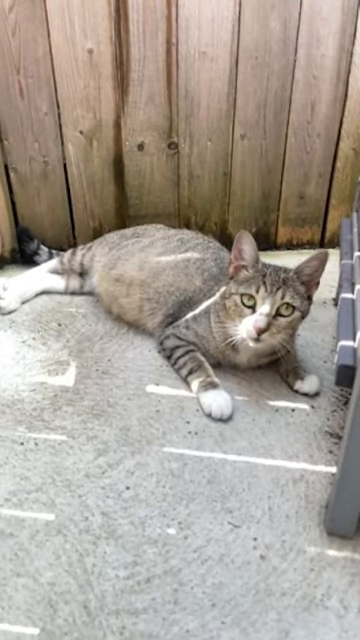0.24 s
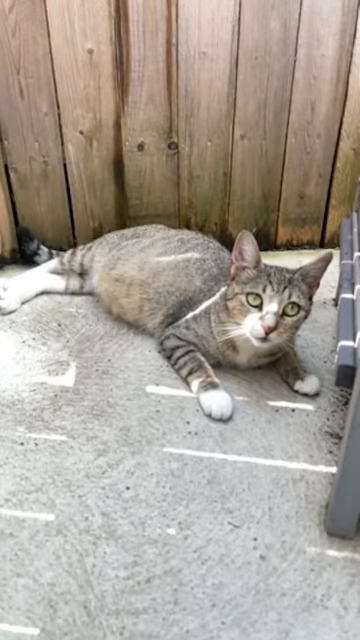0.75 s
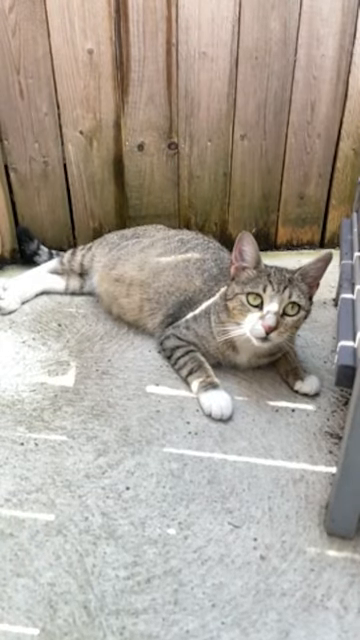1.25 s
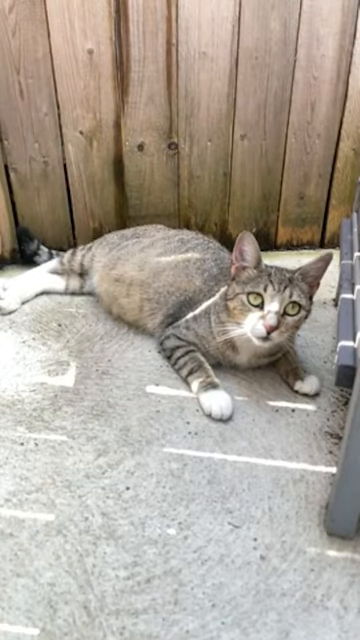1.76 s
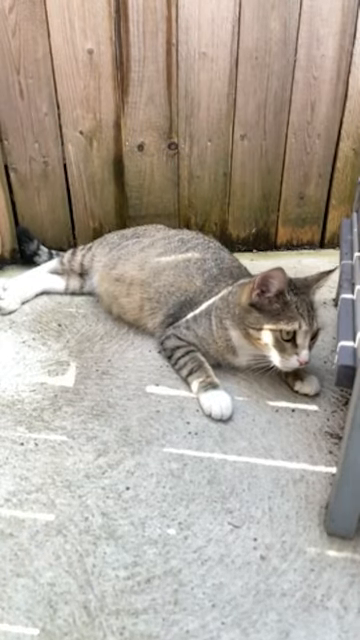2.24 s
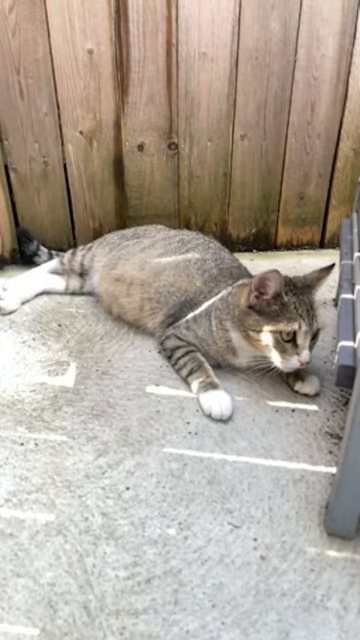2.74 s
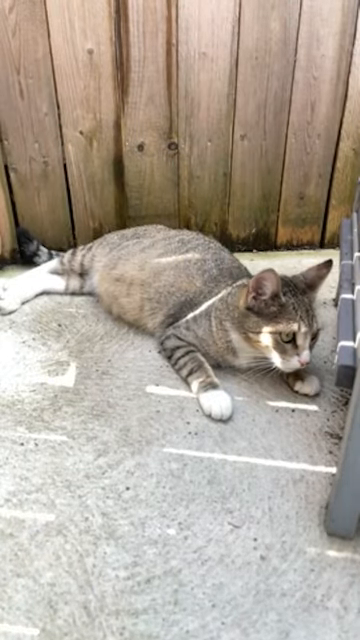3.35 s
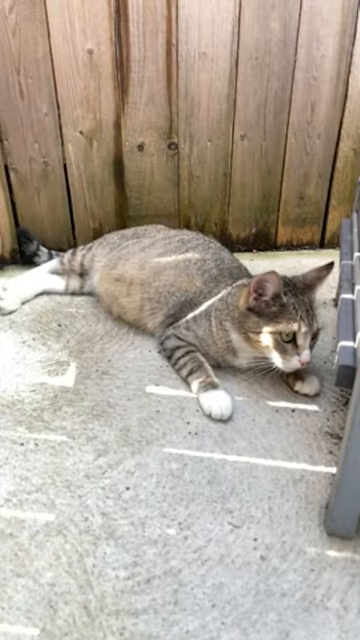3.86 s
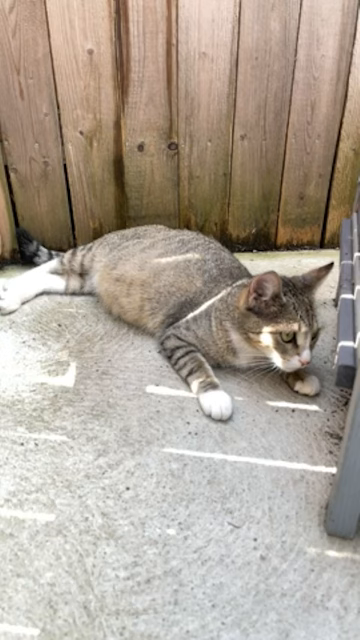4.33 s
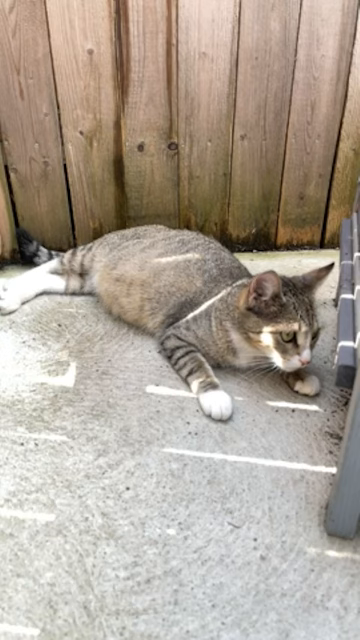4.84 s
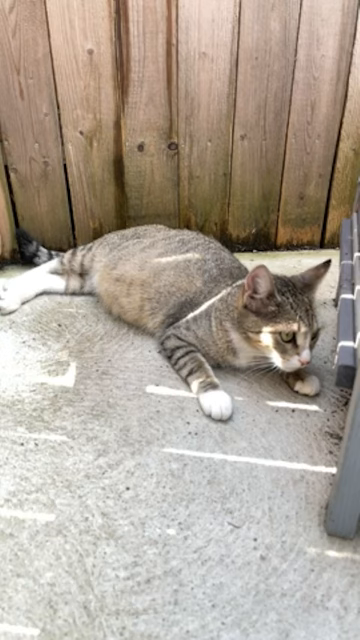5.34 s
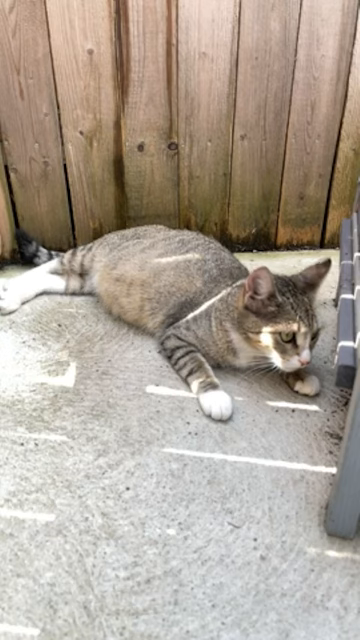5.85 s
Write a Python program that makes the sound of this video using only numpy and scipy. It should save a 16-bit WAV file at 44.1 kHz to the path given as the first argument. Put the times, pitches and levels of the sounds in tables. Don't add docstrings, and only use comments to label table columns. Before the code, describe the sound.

A breaker hammer a few gardens away rattles in rapid blows, pauses while a phone crackles in the hand, tries once, then resumes hammering.

```python
import sys
import numpy as np
from scipy import signal
from scipy.io import wavfile
from scipy.ndimage import uniform_filter1d

SR = 44100
rng = np.random.default_rng(int(sys.argv[2]) if len(sys.argv) > 2 else 0)


def volts_from_decibels(level):
    exponent = np.asarray(level, float) / 20
    return 10 ** exponent


def dump_mix(stems):
    frames = np.atleast_2d(stems).T
    limited = np.clip(frames, -1, 1)
    pcm = np.round(limited * 32767).astype(np.int16)
    wavfile.write(sys.argv[1], SR, pcm)


N = 268569


def evened(x):
    return x / np.sqrt(np.mean(x ** 2) + 1e-20)


def read(points, hz):
    f, value = np.transpose(points)
    return np.interp(np.log(hz + 1), np.log(f + 1), value)


def columns(rows):
    s, *values = np.transpose(rows)
    return np.array([np.interp(np.arange(N) / SR, s, v) for v in values])


def drift(per_s):
    steps = rng.standard_normal(60 * 7)
    slow = signal.lfilter([1], [1, -np.exp(-2 * np.pi * per_s / 60)], steps)
    return np.interp(np.arange(N) * 60 / SR, np.arange(len(slow)), evened(slow))


def noise(colour, patchy_db):
    hz = np.fft.rfftfreq(2048, 1 / SR)
    a, b, patches = rng.standard_normal((N // 512 + 5, 1025, 3)).T
    patches = uniform_filter1d(patches, size=16, axis=0)
    patches = evened(uniform_filter1d(patches, size=6, axis=1))
    z = (a + 1j * b) * volts_from_decibels(read(colour, hz)[:, None] + patchy_db * patches)
    return evened(signal.istft(z, nperseg=2048, noverlap=1536)[1][:N])


def resonate(x, hz, width):
    turn = np.exp(2j * np.pi * hz * np.arange(len(x)) / SR)
    r = np.exp(-np.pi * width / SR)
    return 2 * (turn * signal.lfilter([1 - r], [1, -r], x / turn)).real


def drone(rows, waver, flutter_db):
    t, edge_s = np.arange(N) / SR, .08
    since, left = t - rows[0][0], rows[-1][0] - t
    fade = np.clip(np.minimum(since + edge_s, left + edge_s) / edge_s, 0, 1)
    hz, level_db = columns(rows)
    turns = np.cumsum(hz * (1 + waver * drift(5.7))) / SR
    level = volts_from_decibels(level_db + flutter_db * drift(5.3))
    return fade * level * np.sqrt(2) * np.sin(2 * np.pi * turns)


# f/Hz, level per Hz/dB
TRAFFIC = [(21, -34), (35, -3.5), (70, -4), (105, -5.5), (146, -7.5), (283, -11.5), (454, -22),
           (566, -21.5), (673, -29), (951, -28), (1200, -32.5), (1500, -33), (1950, -59), (3300, -120)]
# f/Hz, level per Hz/dB
LEAVES = [(700, -9), (1200, -7), (2000, -3.5), (2300, -8.5), (4800, -10), (5600, -15), (7200, -12),
          (8200, -22), (10800, -28.5), (13000, -25), (16000, -25)]


def neighbourhood():
    return volts_from_decibels(-43) * noise(TRAFFIC, patchy_db=-0.5) + volts_from_decibels(-58.5) * noise(LEAVES, patchy_db=1.0)


def mains_hum():
    hz, level_db = 100.45, -45.5
    return drone([(0, hz, level_db), (N / SR, hz, level_db)], 0.0009, flutter_db=1.5)


# t/s, f/Hz, level/dB
FIRING = [(0, 54, -42), (.08, 54.3, -38), (.6, 54.3, -41), (.85, 52.9, -37.5), (1.07, 52.43, -49),
          (1.45, 56.5, -46), (1.78, 55.9, -48), (1.87, 55.3, -37), (2.02, 57, -42.5), (2.68, 57.2, -39.5),
          (3.14, 57.6, -44), (3.66, 56.26, -38.5), (3.97, 56.1, -39), (4.14, 56.2, -32.5),
          (4.65, 54.6, -41.5), (4.95, 55.8, -36.5), (5.3, 57.04, -42.5), (6.09, 56.3, -37.5)]


def engine():
    return drone(FIRING, .003, flutter_db=1.6)


# f/Hz, level per Hz/dB
CLOTH_COLOUR = [(1500, -24), (4500, -11), (7000, -7.5), (9000, -18.5), (11500, -13), (13500, -12),
                (15500, -6)]
# loudest t/s, swell/s, fade/s, level/dB
BRUSHES = [
    (1.432, 0.22, .012, -59.5),
    (2.055, .02, .06, -65),
    (2.22, .15, .22, -68),
]


def sleeve():
    t = np.arange(N) / SR
    level_db = np.max([db - 9.0 * np.maximum((s - t) / swell, (t - s) / fade)
                       for s, swell, fade, db in BRUSHES], axis=0)
    return volts_from_decibels(level_db + 4.5) * noise(CLOTH_COLOUR, patchy_db=2.0)


# t/s, ring peak level/dB, ring f/Hz
GRIP_SCRAPES = [(1.422, -43, 3330), (1.424, -45, 2300), (1.430, -44, 3300), (1.433, -44, 2346),
                (1.447, -44, 2600), (1.454, -40, 1450), (1.4603, -42, 1700), (1.466, -38.5, 2950),
                (1.469, -40, 1950), (1.472, -46, 4595), (1.48, -45, 2200)]
# t/s, ring peak level/dB, ring f/Hz, thump level/dB
GRIP_CLICKS = [(1.8357, -39, 2500, -52), (1.836, -45, 1420, -56), (1.8415, -44, 3200, -50),
               (1.8365, -45, 3840, -42), (1.8385, -43, 3140, -50), (1.8444, -48, 2500, -39),
               (1.8473, -48, 1900, -50), (1.8524, -49, 2900, -53), (2.0456, -46, 2360, -41),
               (2.0500, -48, 3300, -47), (2.0530, -42, 2600, -52), (2.0604, -48, 3030, -54),
               (2.0651, -49, 1860, -55)]
# t/s, ring peak level/dB, ring f/Hz, fizz level/dB
CASE_CREAKS = [(2.219, -56, 3163, -63), (2.44, -52, 3810, -54), (2.4488, -48, 3650, -56),
               (2.4633, -38, 3550, -49), (2.4684, -43, 3730, -53), (2.4748, -44, 3060, -48),
               (2.4820, -41, 3750, -50), (2.4884, -46, 3130, -55), (2.495, -42, 3680, -55),
               (2.5005, -44, 3450, -57), (2.5130, -45, 3400, -43.5), (2.7528, -55, 3410, -62),
               (2.7614, -51, 3550, -60), (2.7672, -52, 3310, -60)]


def grips():
    rows = [(*scrape, -58, 1000, -64.5) for scrape in GRIP_SCRAPES]
    rows += [(*click, 636, -66.5) for click in GRIP_CLICKS]
    for k, (s, db, hz, fizz_db) in enumerate(CASE_CREAKS):
        panel_hz = (750, 1150)[k % 2]
        rows.append((s, db, hz, db - 10, panel_hz, fizz_db))
    return rows


# t/s, level/dB, f/Hz
FINGER_TAPS = [
    (1.8425, -36, 340),
    (2.0455, -29, 300),
]


def hand():
    out, t = np.zeros(N + 4000), np.arange(4000) / SR
    fizz = noise(CLOTH_COLOUR, patchy_db=1.0)
    for s, db, hz, thump_db, thump_hz, fizz_db in grips():
        at = round(s * SR)
        grit, push = rng.standard_normal((2, 4000))
        grit[:3] += 4.5 * np.sign(grit[0])
        ring = resonate(resonate(grit * volts_from_decibels(-60 * t / 0.042), hz, 480), hz, 480)
        thump = resonate(resonate(push * volts_from_decibels(-60 * t / 0.023), thump_hz, 330), thump_hz, 330)
        sound = volts_from_decibels(db - 1.4) * ring / abs(ring).max()
        sound += volts_from_decibels(thump_db + 1.0) * thump / abs(thump).max()
        sound += volts_from_decibels(fizz_db + 6.5 - 60 * t / 0.034) * (1 - np.exp(-t / .0007)) * fizz[at:at + 4000]
        out[at:at + 4000] += sound
    for s, db, hz in FINGER_TAPS:
        at, t60_s = round(s * SR), .04
        swell = 1 - np.exp(-t / 0.0016)
        out[at:at + 4000] -= volts_from_decibels(db - 60 * t / t60_s) * swell * np.sin(2 * np.pi * hz * t)
    return out[:N] + sleeve()


# start t/s, length/s, f/Hz, level/dB
WALL_TONES = [(0, 0.59, 72, -40), (0.86, 0.33, 72, -41), (1.46, .12, 71, -44), (4.5, 0.501, 71, -44),
              (5.0, 1.1, 70.5, -44), (0, .5, 95.5, -42.5), (4.33, .15, 99, -41), (4.55, .2, 93, -46),
              (5.1, .5, 98, -41), (.1, .8, 125.5, -43), (1.0, .3, 125.5, -48), (4.55, .35, 127, -42),
              (4.95, .4, 133, -44.5), (5.62, .25, 129, -41), (4.05, .35, 295, -50), (0.43, 0.697, 231, -48),
              (0.55, .45, 213, -50.5), (4.0, .6, 232.5, -47.5), (4.8, .5, 233, -47.5),
              (5.47, .25, 228, -46), (4.0, .5, 210, -49), (5, 0.38, 212, -48.5), (5.0, .6, 172, -48.5),
              (5, 0.72, 289, -49), (-0.02, .5, 170, -48)]


def walls():
    return sum(drone([(s, hz, db), (s + length, hz, db)], 0.0041, flutter_db=2.5)
               for s, length, hz, db in WALL_TONES)


# start t/s, wind-up/s, length/s, crushing level/dB, fresh bite level/dB
WORK_SPELLS = [
    (-1, .2, 1.95, -44, 0),
    (.66, .2, .45, -43, 1.5),
    (3.505, .13, .215, -49.5, 7),
    (3.92, .17, 3, -43.5, 7),
    (4.62, .2, .7, -43.5, 3.5),
    (5.4, .2, 1, -43.3, 2.5),
]


def effort(above_db, bite_share, release_db, slowness):
    t, level_db = np.arange(N) / SR, []
    for start, rise, length, db, bite_db in WORK_SPELLS:
        age = t - start
        wind_db = -17 * np.maximum(1 - age / (rise * slowness), 0) ** 2
        fresh_db = bite_share * bite_db * np.exp(-np.maximum(age, 0) / 0.33)
        fall_db = release_db * np.maximum(age - length, 0)
        level_db.append(db + above_db + wind_db + fresh_db - fall_db)
    return np.max(level_db, axis=0)


MODE_HZ = [4848, 4288, 968, 6236, 5804, 9871, 8515, 11060, 14348, 13785, 15101]
MODE_DB = [-15.5, -23, -17, -21, -24, -26, -29.5, -32, -24.5, -27, -38]
# t/s, level/dB
LOOSE_GRIP = [(0, -1), (.8, 0), (1.1, 1), (1.3, 1), (3.55, 1), (3.72, 5), (4.0, 2.5), (4.3, 2.5),
              (4.42, -3), (4.68, -2), (4.85, 2.5), (5.3, 1), (5.45, -3), (5.7, 1.5), (6.09, -1.5)]
# start t/s, length/s, mode f/Hz, extra level/dB
SINGING = [ (0.0, .13, 4848, 6), (.21, .14, 4848, 6), (.5, .3, 5804, 9), (.55, .2, 6236, 4),
           (.56, .6, 9871, 4), (.84, .41, 4848, 3), (.87, .31, 4288, 5), (.96, .31, 8515, 5),
           (.98, .17, 13785, 7), (3.55, .27, 9871, 6), (3.59, .13, 968, 4), (3.59, .21, 14348, 4),
           (3.59, .22, 13785, 5), (3.61, .25, 11060, 5), (3.6, .2, 8515, 7), (3.99, .85, 9871, 4),
           (4.01, .33, 6236, 7), (3.99, .21, 15101, 10), (3.99, .23, 11060, 4), (4.18, .14, 4848, 6),
           (4.68, .68, 11060, 5), (4.82, .5, 4848, 7), (4.81, .12, 6236, 5), (5.49, .56, 6236, 5),
           (5.54, .42, 8515, 6), (5.56, .21, 4848, 6), (5.61, .24, 13785, 5), (5.75, .26, 9871, 7),
           (5.94, .13, 5804, 8)]


def bit(throb):
    out, t, edge_s, step = np.zeros(N), np.arange(N) / SR, .04, 32
    coarse, rate = t[::step], SR / step
    level_db = effort(0, 0.55, release_db=75, slowness=1.1) + columns(LOOSE_GRIP)[0]
    for hz, db in zip(MODE_HZ, MODE_DB):
        caught_db = np.zeros(len(coarse))
        for s, length, mode_hz, more_db in SINGING:
            if abs(mode_hz / hz - 1) < .015:
                inside = np.minimum(coarse - s, s + length - coarse)
                caught_db += more_db * np.clip(inside / edge_s + .5, 0, 1)
        jog, a, b = rng.standard_normal((3, len(coarse)))
        jog *= np.sqrt(2 * np.pi * 7.0 / rate)
        bend_hz = hz * .0007 * drift(2.505)[::step]
        line = np.exp(1j * np.cumsum(jog + 2 * np.pi * bend_hz / rate))
        skirt = signal.lfilter([1], [1, -np.exp(-np.pi * 60.0 / rate)], a + 1j * b)
        swing = volts_from_decibels(level_db[::step] + db + caught_db + 2.6 * drift(22.0)[::step])
        swing = swing * (volts_from_decibels(-1.5) * line + volts_from_decibels(-6.5) * skirt / skirt.std())
        out += np.sqrt(2) * (np.interp(t, coarse, swing) * np.exp(2j * np.pi * hz * t)).real
    return throb * out


# t/s, blows per second/Hz
BLOW_RATE = [(0, 19), (.3, 18.2), (.8, 17.6), (1.3, 16.5), (3.4, 19.6), (4.3, 19.4), (4.6, 18),
             (4.85, 18.2), (5.1, 19.5), (5.6, 17.8), (5.85, 19.1), (6.09, 16.8)]
# level above the crushing/dB, share of the fresh bite, release/(dB/s), slowness of wind-up
LAYER_EFFORT = [
    (3.8, .45, 40, 1.3),
    (0, .3, 42, 1.25),
    (-7, 1, 60, 1.05),
    (-23.5, .9, 120, 1.05),
]
# f/Hz, level/dB
GROUND_THUMPS = [(30, -20), (37, -18), (55, -22), (72, -11), (92, 2.5), (112, -8), (128, -10), (150, -1.5),
                 (190, -7.5), (212, -3.5), (260, -7.5), (298, -5.5), (400, -12), (500, -15)]
# f/Hz, level per Hz/dB
GROUND_RUMBLE = [(24, -28), (40, -11.5), (70, 0), (183, -5), (233, -7), (385, -8), (455, -22), (614, -19.5),
                 (700, -30), (910, -26), (1540, -120)]
# f/Hz, level per Hz/dB
STONE_CRUSH = [(290, -44), (500, -4), (829, -7), (960, -3.5), (1300, -5), (1950, -3.5), (2410, -8.5),
               (3260, -11), (3780, -20), (4500, -11.5), (5850, -40), (9900, -120)]
# f/Hz, level per Hz/dB
STONE_GRIT = [(2060, -36), (3500, -6.5), (3920, -6), (4580, -7), (4980, 1), (5560, -5.5), (7130, -3),
              (8120, -12.5), (9000, -14), (11700, -31), (19800, -120)]
# f/Hz, level per Hz/dB
STONE_DUST = [(6000, -32), (8000, -19), (9000, -5), (10500, -2.5), (12200, -3.5), (14200, 2), (15000, -1),
              (16000, -4.5)]


def breaker():
    pace = columns(BLOW_RATE)[0]
    turns = np.cumsum(pace * (1 + 0.0019 * drift(3.0))) / SR
    shake, crush, grit, dust = (volts_from_decibels(effort(*layer) + 0.4 * drift(3.3)) for layer in LAYER_EFFORT)
    strength = rng.uniform(0.41, 1, 200)[turns.astype(int)]
    blows = 1 + .5 * strength * np.exp(-(turns % 1) / 0.58)
    throb = evened(uniform_filter1d(blows, size=300))
    thumps = np.zeros(N)
    for k in range(2, 28):
        level = volts_from_decibels(read(GROUND_THUMPS, k * pace) + 3.34 * drift(1.4))
        thumps += level * np.cos(2 * np.pi * (k * turns + rng.random()))
    ground = volts_from_decibels(-2.0) * evened(thumps) + volts_from_decibels(-3.5) * noise(GROUND_RUMBLE, patchy_db=0.0)
    stone = crush * volts_from_decibels(-0.08) * noise(STONE_CRUSH, patchy_db=0.87)
    stone += grit * volts_from_decibels(1.5) * noise(STONE_GRIT, patchy_db=1)
    stone += dust * volts_from_decibels(7.5) * noise(STONE_DUST, patchy_db=0.5)
    return shake * ground + throb * stone + bit(throb)


def scene():
    background = neighbourhood() + mains_hum() + engine()
    return (background + hand() + walls() + breaker())[None]


def top_cut(x):
    return signal.sosfilt(signal.butter(12, 16160, fs=SR, output="sos"), x)


def record(dry):
    cut = signal.sosfilt(signal.butter(5, 40, "high", fs=SR, output="sos"), dry)
    low_pass = signal.firwin(801, 15760, window=("kaiser", 8), fs=SR)
    cut = signal.oaconvolve(cut, low_pass[None], "same")
    return top_cut(cut)


dry = scene()
out = record(dry)
dump_mix(out)
```